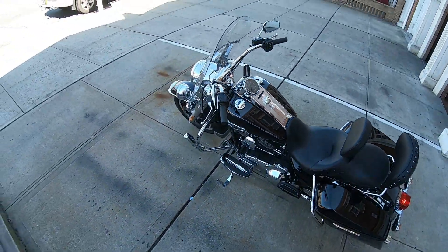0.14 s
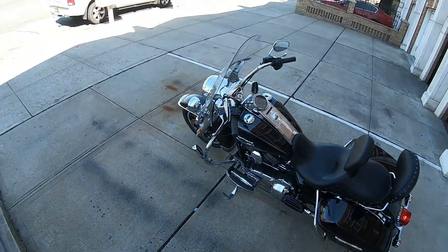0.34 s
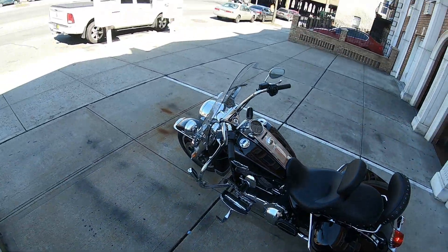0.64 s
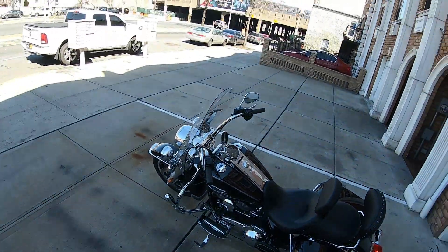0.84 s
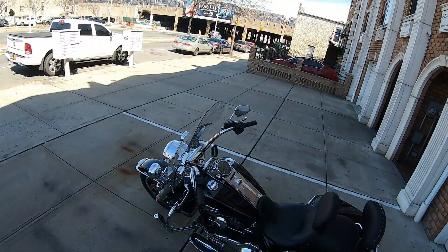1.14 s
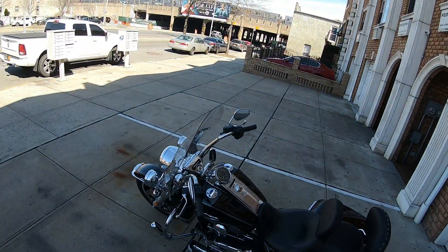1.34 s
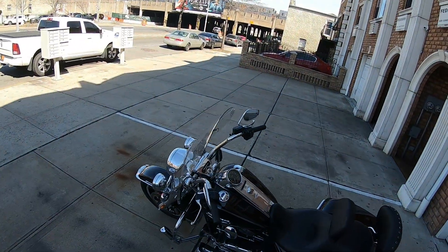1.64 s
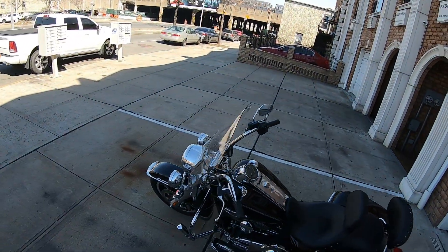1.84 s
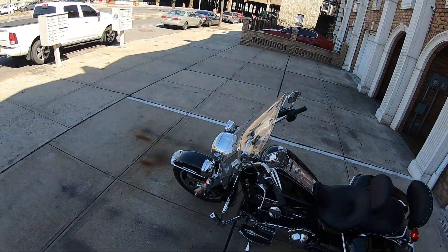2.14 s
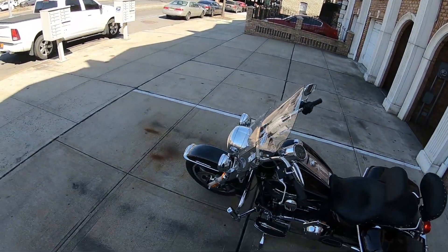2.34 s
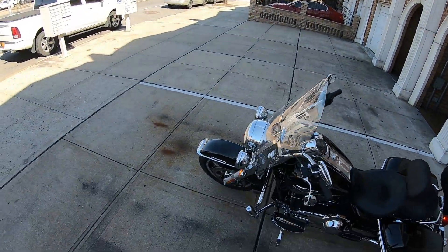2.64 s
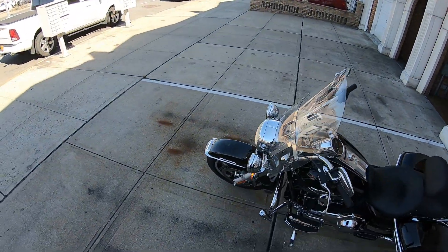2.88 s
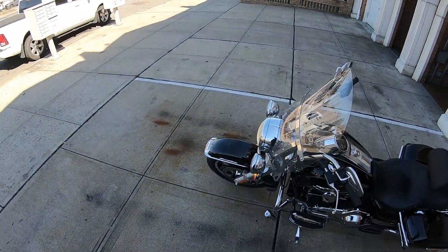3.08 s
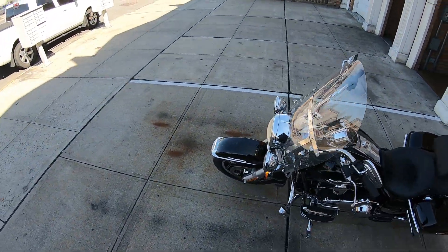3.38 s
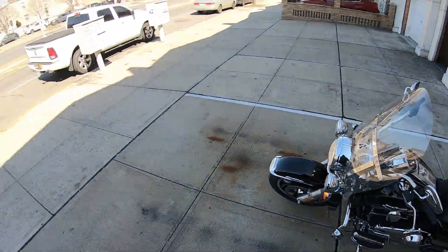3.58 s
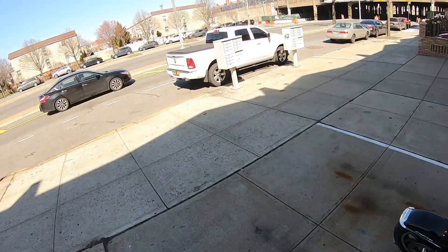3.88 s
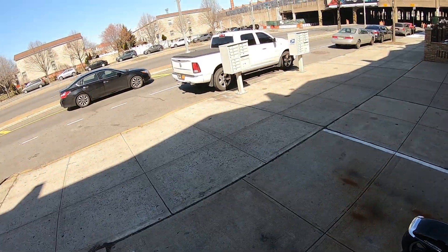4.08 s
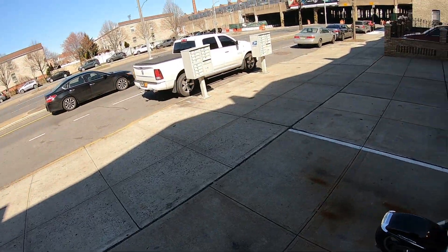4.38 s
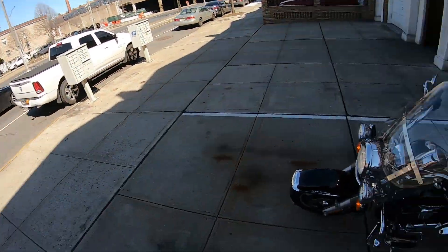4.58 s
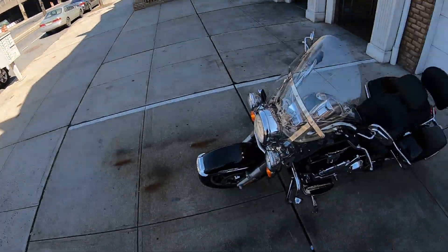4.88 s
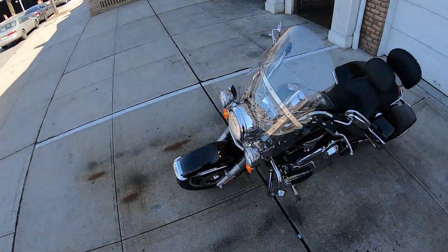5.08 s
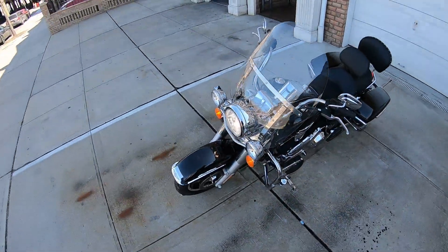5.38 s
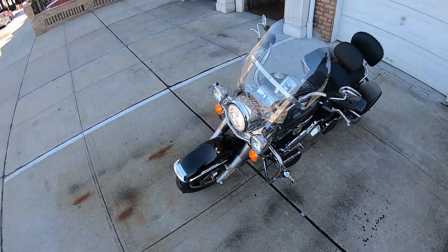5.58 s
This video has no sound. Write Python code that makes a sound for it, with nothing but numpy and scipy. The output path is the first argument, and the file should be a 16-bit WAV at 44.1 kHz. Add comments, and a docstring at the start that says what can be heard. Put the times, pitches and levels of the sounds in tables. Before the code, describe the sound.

Steady, loping exhaust rumble and mechanical clatter from a parked motorcycle idling outdoors, heard close up with brief wind buffets.

```python
"""A big V-twin motorcycle idles on a forecourt while someone walks round it with a small camera.
We start by the tailpipes: two unevenly spaced firings a cycle ring the pipes, gas rasps behind them,
and the weaker cylinder sometimes misses. From about 1.4 to 3 s, puffs of wind brush the microphone.
Alongside the engine the valve gear ticks and clatters, reflected by the pavement. By the end we are
ahead of the front wheel, where the boom has thinned and the bark comes forward."""
import sys
import numpy as np
from scipy import signal
from scipy.fft import rfft, irfft, next_fast_len
from scipy.io import wavfile
from scipy.ndimage import uniform_filter1d, minimum_filter1d

SR = 44100
rng = np.random.default_rng(int(sys.argv[2]) if len(sys.argv) > 2 else 0)


def persist_wave(psi):
    """Save psi, clipped to +-1, as 16-bit WAV."""
    counts = np.round(np.clip(psi, -1, 1) * 32767).astype(np.int16)
    wavfile.write(sys.argv[1], SR, np.atleast_2d(counts).T)


N = 252252
TIME = np.arange(N) / SR
# In shares of a cycle: the first firing, the gap to the second, a valve's delay after its firing.
FIRST_FIRING, TWIN_GAP, VALVE_LAG = .387, .43, .166
# The walk round the bike. Each row: time in seconds, place (0 by the tailpipes, 1 ahead of the bike).
WALK_PATH = [(0, 0.21), (1.25, 0.037), (1.9, 0.41), (3.2, 0.652), (5.72, 1)]


def undb(db):
    return 10 ** (np.asarray(db) / 20)


def unit(x):
    """Scale to rms 1."""
    return x / np.sqrt(np.mean(x ** 2))


def noise():
    return rng.standard_normal(N)


def curves(table):
    """Each column of a table, joined by straight lines in time."""
    seconds, *columns = np.transpose(table)
    return [np.interp(TIME, seconds, column) for column in columns]


def colour(x, points):
    """Causal EQ through (Hz, dB) points, falling steeply above the last."""
    size = 2 * next_fast_len(N)
    hz, db = np.transpose(points)
    freqs = np.maximum(np.arange(size // 2 + 1) * SR / size, 1)
    gain = undb(np.interp(np.log(freqs), np.log(hz), db)) * np.minimum(1, hz[-1] / freqs) ** 4
    cepstrum = irfft(np.log(gain))
    cepstrum[1:size // 2] *= 2  # fold to minimum phase
    cepstrum[size // 2 + 1:] = 0
    return irfft(rfft(x, size) * np.exp(rfft(cepstrum)))[:N]


def resonate(x, modes):
    """Steep resonances, scaled together to rms 1; neighbouring modes swing in opposite senses."""
    out = 0
    for k, (hz, width, db) in enumerate(modes):
        b, a = signal.iirpeak(hz, hz / width, fs=SR)
        out = out + (-1) ** k * undb(db) * signal.lfilter(b, a, signal.lfilter(b, a, x))
    return unit(out)


def strikes(times, sizes):
    """One impulse at each time."""
    at = (times * SR).astype(int)
    inside = (at >= 0) & (at < N)
    return np.bincount(at[inside], sizes[inside], N)


def fade(x, seconds):
    """Give each impulse an exponential tail."""
    return signal.lfilter([1], [1, -np.exp(-1 / (seconds * SR))], x)


def burst(x, rise_s, fall_s):
    """Give each impulse a soft attack and an exponential tail, peaking near 1."""
    return fade(fade(x, fall_s), rise_s) / SR * (1 / rise_s + 1 / fall_s) * np.sqrt(2)


def walk_gain(tail_db, front_db):
    """Gain of one voice as the microphone goes from the tail to the front."""
    return undb(tail_db + (front_db - tail_db) * curves(WALK_PATH)[0])


def gain_near(place, half_width, db):
    """A swell or dip round one place on the walk; a half width of 0 gives none."""
    return undb(db * np.exp(-((curves(WALK_PATH)[0] - place) / half_width) ** 2))


def beamed(x, modes):
    """Ring the modes of a metal part; each changes level as the microphone crosses its lobe."""
    return sum(undb(db) * gain_near(place, half_width, lobe_db) * resonate(x, [(hz, width, 0)])
               for hz, width, db, place, half_width, lobe_db in modes)


def cycle_times(offset):
    """The moments at which the engine passes one point of its cycle."""
    # The idle hunts a little. Each row: time in seconds, four-stroke cycles a second.
    idle_speed = [(0.0, 11.979), (0.48, 11.818), (0.61, 11.518), (1.24, 12.006), (1.39, 11.744),
                  (2.39, 11.81), (2.94, 11.987), (3.25, 11.657), (3.58, 12.014), (4.37, 11.705),
                  (4.95, 12.251), (5.72, 11.415)]
    cycles = np.cumsum(curves(idle_speed)[0]) / SR
    return np.interp(np.arange(cycles[-1] - offset) + offset, cycles, TIME)


def twin_strikes(lag, second_size, scatter_db):
    """An uneven blow from each cylinder, a share of a cycle (lag) after it fires."""
    first, second = cycle_times(FIRST_FIRING + lag), cycle_times(FIRST_FIRING + lag + TWIN_GAP)
    sizes = np.r_[np.ones(len(first)), np.full(len(second), second_size)]
    sizes *= undb(scatter_db * rng.standard_normal(len(sizes)))
    return strikes(np.r_[first, second], sizes)


def high_hiss(pulsing):
    """A faint high hiss near 11 kHz that fades briefly midway."""
    # The row: centre and width in Hz, level in dB, then the dip's place, half width and depth in dB.
    hiss_band = [(11400, 2600, -80.5, .6, 0.1, -11.5)]
    hz, width, db, *dip = hiss_band[0]
    return undb(db) * gain_near(*dip) * resonate(pulsing + noise(), [(hz, width, 0)])


def wind(breeze_db=-34.0):
    """Short eddies at the microphone over a light, steady rumble."""
    # Each row: peak time, rise and fall in seconds, then hiss, flutter and rumble in dB.
    puffs = [(1.444, 0.07, 0.052, -29, -25.5, -24), (1.515, 0.0055, 0.028, -27, -26, -14.5),
             (1.553, 0.017, 0.058, -25.5, -33, -17), (1.803, 0.035, 0.049, -29.5, -42, -17.5),
             (2.424, 0.013, 0.034, -15, -36, -19), (2.481, 0.004, 0.013, -26, -43, -20),
             (2.67, 0.15, 0.05, -30, -47, -29), (2.92, 0.2, 0.2, -59, -43, -20)]
    # The EQ of hiss and rumble. Each row: frequency in Hz, relative level in dB.
    hiss_eq = [(60, 4), (250, -6), (420, -6), (800, -13), (1300, -20), (2500, -36.5), (5000, -68.5)]
    rumble_eq = [(10, -10), (30, 11), (70, 16.5), (110, 15), (200, -6.5), (500, -67.5)]
    # An eddy's flutter. The row: pitch and width in Hz, relative level in dB.
    flutter_band = [(193, 63, 0)]
    hiss, flutter, rumble = 0, 0, undb(breeze_db)
    for peak_s, rise_s, fall_s, hiss_db, flutter_db, rumble_db in puffs:
        swell = np.exp(-((TIME - peak_s) / np.where(TIME < peak_s, rise_s, fall_s)) ** 2)
        hiss += undb(hiss_db) * swell
        rumble += undb(rumble_db) * swell
        flutter += undb(flutter_db) * swell
    return (hiss * unit(colour(noise(), hiss_eq))
            + rumble * unit(colour(noise(), rumble_eq))
            + flutter * resonate(noise(), flutter_band))


def pavement(x, lag_s=.0028, sway_s=0.000495, share=0.31):
    """Add the ground reflection; its delay shifts as the microphone is carried round."""
    sway = signal.resample(rng.standard_normal(8), N)
    reflection = np.interp(TIME - lag_s - sway_s * sway, TIME, x)
    return (x + share * reflection) / np.hypot(1, share)


def cover_buzz():
    """Every closing of a valve sets the thin covers buzzing for a moment; a faint hiss lies above."""
    # Each row: frequency in Hz, relative level in dB.
    buzz_eq = [(3000, -2.5), (4000, 7), (4600, -7), (5700, -16.5), (7000, -5.5), (8300, -1), (8900, -7.5),
               (9700, -25), (15000, -41.5)]
    # Each row: time in seconds, level in dB.
    buzz_level = [(0, -63), (1.3, -59), (2.3, -63), (3.5, -65), (4.4, -69), (4.8, -53.5), (5.3, -62),
                  (5.72, -61.5)]
    closings = twin_strikes(lag=0.15, second_size=0.23, scatter_db=2)
    shake = burst(closings, rise_s=0.004, fall_s=0.0075) * noise()
    buzz = undb(curves(buzz_level)[0]) * unit(colour(shake, buzz_eq))
    return buzz + high_hiss(unit(shake))


def piston_knock(level_db=-47):
    """The pistons slap the crankcase with a dull knock after each firing."""
    # The row: pitch and width in Hz, relative level in dB.
    crankcase_mode = [(321, 136, 0)]
    slaps = twin_strikes(lag=0.1351, second_size=0.12, scatter_db=2.5)
    return undb(level_db) * resonate(slaps, crankcase_mode)


def clatter(count=30, spread_db=3, scatter_db=8, jitter_s=.0008, ring_s=0.0055, whirr=1.04):
    """Gears, chain and lifters knock at the same points of every cycle and ring the castings."""
    hits = np.zeros(N)
    offsets = (np.arange(count) + rng.random(count)) / count
    for offset, weight in zip(offsets, rng.uniform(0.73, 1, count)):
        times = cycle_times(offset)
        slip, force = rng.standard_normal((len(times), 2)).T
        hits += strikes(times + jitter_s * slip, undb(spread_db * weight + scatter_db * np.tanh(force)))
    casting = rng.standard_normal(SR // 20) * np.exp(-TIME[:SR // 20] / ring_s)
    return unit(signal.fftconvolve(hits, casting)[:N]) + whirr * noise()


def engine_clatter(surge=0.77, heads_db=-49, fins_shade=1.4):
    """The clatter as the crankcase, the heads, their cooling fins and the thin covers radiate it."""
    # The engine is shaded as the microphone turns to the street. Each row: time in seconds, gain in dB.
    facing = [(0, 0.5), (1, 1.5), (1.5, 0.5), (2.7, 3.5), (3.45, 2.5), (3.95, -2.5), (4.45, -5),
              (4.8, -0.5), (5.72, -1.5)]
    # Each row: time in seconds, midrange level in dB, treble level in dB.
    clatter_level = [(0, -45, -56), (1.1, -44.5, -56.5), (1.7, -46, -58), (2.7, -47, -58),
                     (3.1, -43, -56.5), (4, -46, -59), (4.5, -45.5, -57.5), (4.7, -45.5, -53.5),
                     (5.1, -44.5, -55), (5.45, -49, -58.5)]
    # The EQ of crankcase, heads and sizzling covers. Each row: frequency in Hz, relative level in dB.
    case_eq = [(1000, -35.5), (1350, 3.5), (1680, 3), (2000, 1.5), (2350, 1.5), (2650, 0), (3100, -57.5)]
    heads_eq = [(2300, -35), (2750, 7), (3050, 7.5), (3290, 2), (3600, 5.5), (4050, 2.5), (4500, -7.5),
                (5300, -60.5)]
    sizzle_eq = [(4000, -1), (4800, -4.5), (5700, -11), (6500, -10.5), (7200, -5.5), (8100, -3.5),
                 (8800, -10.5), (9600, -33.5), (11800, -30.5), (15000, -50.5)]
    # Each row: pitch and width in Hz, level in dB, lobe place, half width, gain in dB.
    fin_modes = [(3283, 170, -59, .64, 0, 8), (3330, 110, -60, 0, 0.2, 5.5),
                 (3257, 67, -63.5, 0.96, 0.06, 12), (3780, 110, -66, .62, 0, 5),
                 (6670, 1500, -85.5, .665, .17, 18), (7070, 130, -84, 0.7, .035, 17)]
    facing_db = curves(facing)[0]
    midrange_db, treble_db = curves(clatter_level)
    parts = ((midrange_db, case_eq), (heads_db + facing_db, heads_eq), (treble_db, sizzle_eq))
    fins = undb(fins_shade * facing_db) * beamed(clatter(), fin_modes)
    body = sum(undb(db) * unit(colour(clatter(), eq)) for db, eq in parts)
    # The strong power stroke loads the gears, so the clatter surges once a cycle.
    strokes = cycle_times(FIRST_FIRING + 0.14)
    load = 1 + surge * burst(strikes(strokes, np.ones(len(strokes))), rise_s=0.0034, fall_s=0.0048)
    return unit(load) * (fins + body)


def contact(hits, rough=.8, rebound_s=.003, rebound=0.45):
    """Each blow, its rebound a few milliseconds later and a short rattle."""
    rattle = burst(hits, rise_s=0.00094, fall_s=0.0042)
    at = np.flatnonzero(hits)
    delays = rebound_s * (1 + .15 * rng.standard_normal(len(at)))
    bounces = strikes(at / SR + delays, rebound * hits[at])
    return np.std(rattle) * unit(unit(hits + bounces) + rough * unit(rattle * noise()))


def valve_ticks(front_db=-40, rear_db=-47, scatter_db=0.5, lead_s=0.0003, snap_db=-12, tap_db=-0.5):
    """A valve snaps shut after each firing and clacks in the rocker cover; hard blows ring the steel."""
    # The hardest ticks. Each row: time in seconds, cover clack in dB, steel ring in dB.
    hard_ticks = [(0.7256, -37.5, -37), (0.8099, -37.5, -33), (0.8942, -37, -38.5), (0.9794, -39.5, -33.5),
                  (1.0617, -36.5, -34), (1.3195, -36, -45.5), (1.486, -39.5, -36), (1.7394, -32.5, -32.5),
                  (1.8237, -35, -35.5), (1.9125, -38.5, -31), (2.0827, -37.5, -40), (2.3352, -30.5, -43),
                  (2.6723, -39, -39.5), (2.8437, -36, -38.5), (2.9242, -34.5, -36), (3.0064, -29, -34.5),
                  (3.0934, -31, -40), (3.1763, -35, -42), (3.2637, -29.5, -40.5), (3.434, -38.5, -35.5),
                  (3.6847, -37.5, -45), (4.0193, -36, -52), (4.5301, -35, -49.5), (4.6141, -30, -45.5),
                  (4.6969, -36.5, -49), (4.781, -35.5, -51), (4.945, -38, -45), (5.0246, -37.5, -43),
                  (5.1102, -37.5, -46), (5.1943, -36, -44), (5.279, -36, -41.5)]
    # The rocker cover. Each row: pitch and width in Hz, level in dB, lobe place, half width, gain in dB.
    cover_modes = [(1760, 170, -12, .65, 0.13, 8.5), (3765, 210, -6, 0.8, 0.2, 1),
                   (3966, 270, -8, 0.9, 0.2, 5), (4530, 440, -30.5, .95, .06, 20.5),
                   (8400, 720, -32, .95, .09, 12)]
    # Each row: frequency in Hz, relative level in dB.
    snap_eq = [(600, -37.5), (1300, -17.5), (1720, -0.5), (2500, -2.5), (3300, 7), (4000, 10), (4600, -24),
               (6000, -26), (8200, -19.5), (9700, -36.5), (15000, -50.5)]
    # Each row: pitch and width in Hz, relative level in dB.
    steel_modes = [(1700, 200, -8), (3334, 800, 0)]
    first = cycle_times(FIRST_FIRING + VALVE_LAG)
    second = cycle_times(FIRST_FIRING + VALVE_LAG + TWIN_GAP)
    first_db = front_db + scatter_db * rng.standard_normal(len(first))
    second_db = rear_db + scatter_db * rng.standard_normal(len(second))
    taps = np.zeros(len(first))
    for time_s, clack_db, ring_db in hard_ticks:
        nearest = np.argmin(abs(first - time_s))
        first[nearest] = time_s - lead_s
        first_db[nearest], taps[nearest] = clack_db, undb(ring_db)
    # The second cylinder's valve is clearest beside the engine.
    beside = gain_near(place=0.66, half_width=0.076, db=6.5)
    clack = contact(strikes(first, undb(first_db)) + beside * strikes(second, undb(second_db)))
    ring = contact(strikes(first, taps))
    cover = beamed(clack, cover_modes) + undb(snap_db) * unit(colour(clack, snap_eq))
    return np.std(clack) * cover + np.std(ring) * undb(tap_db) * resonate(ring, steel_modes)


def firings(second_db=-5, scatter_db=1.3, second_scatter_db=2.07, jitter_s=.00016):
    """Pressure pulses of the two cylinders; the second burns weaker and less evenly."""
    # The second cylinder's misses. Each row: time in seconds, change of level in dB.
    misses = [(.25, -3), (.68, -11), (.85, -5), (1.44, -8.5), (1.61, -3), (2.46, -3), (2.71, -0.5),
              (3.89, -4.5), (4.06, -7), (4.74, -5)]
    first, second = cycle_times(FIRST_FIRING), cycle_times(FIRST_FIRING + TWIN_GAP)
    burn_db = second_db + second_scatter_db * rng.standard_normal(len(second))
    for time_s, db in misses:
        burn_db[np.argmin(abs(second + .02 - time_s))] += db
    times = np.r_[first, second]
    sizes = undb(np.r_[scatter_db * rng.standard_normal(len(first)), burn_db])
    return strikes(times + jitter_s * rng.standard_normal(len(times)), sizes)


def exhaust(pulses, flow_s=0.045, steady_flow=1.0, thump_db=-14):
    """Each pulse rings the pipes, and the turbulent gas behind it keeps them rasping."""
    # The pipes' three low voices. Each row: pitch and width in Hz, relative level in dB.
    boom_modes = [(52.97, 8.8, 6.5), (179.5, 50, -14)]
    thump_modes = [(96.6, 30.2, -6.5), (124, 42.4, 0.5), (134.33, 30.1, 1), (152.55, 9.1, -11.5)]
    bark_modes = [(195.5, 27.5, 12), (232, 117, -7.5)]
    # The tailpipes' hollow tones and the header pipes' steel walls.
    # Each row: pitch and width in Hz, level in dB, lobe place, half width, gain in dB.
    tailpipe_modes = [(171.3, 35, -42.5, 0.1, .2, 16.5), (275, 11, -55, 0.2, 0.5, 8.5),
                      (347, 27, -53, .08, .18, 16)]
    header_modes = [(813, 43, -55.5, 0, 0.9, 11), (851, 7.8, -58, 0.8, 0.4, 3),
                    (923, 66, -56.5, 0.7, 0.3, 6), (1122, 160, -53, .7, .08, 6.5),
                    (1189, 58, -52, 0.5, 0.5, -5), (1677, 59, -63.5, .05, 0.1, 12)]
    # Each row: frequency in Hz, relative level in dB.
    rasp_eq = [(250, -24.5), (400, -0.5), (520, -2.5), (600, 0), (730, 0), (830, 2.5), (940, -0.5),
               (1070, -6), (1220, -3), (1350, -14.5), (1700, -40)]
    # Each row: time in seconds, level in dB.
    rasp_level = [(0, -39.5), (1.2, -39), (1.75, -45), (2.7, -40.5), (2.95, -46.5), (3.35, -49.5),
                  (3.8, -44.5), (4.6, -42.5), (5.1, -46), (5.72, -50.5)]
    flow = unit(fade(pulses, flow_s)) + steady_flow
    push, gas = unit(pulses), unit(flow * noise())  # more gas, rougher voice
    boom = walk_gain(tail_db=-17, front_db=-26.5) * resonate(push + 0.12 * gas, boom_modes)
    thump = undb(thump_db) * resonate(push + .055 * gas, thump_modes)  # carries equally all round
    bark = walk_gain(tail_db=-37, front_db=-29) * resonate(push + gas, bark_modes)
    bark *= gain_near(place=0.56, half_width=0.12, db=-7.5)  # dips beside the bike
    tailpipes = beamed(push + 2.1 * gas, tailpipe_modes)
    headers = beamed(push + 3 * gas, header_modes)
    rasp = undb(curves(rasp_level)[0]) * unit(colour(flow * noise(), rasp_eq))
    return boom - thump + bark + tailpipes + headers + rasp


def scene():
    """The idling bike and the wind, in mono."""
    throb = exhaust(firings()) + piston_knock()
    mechanics = engine_clatter() + valve_ticks() + cover_buzz()
    return (throb + pavement(mechanics) + wind())[None]


def record(dry, ceiling=0.46, top_hz=15600):
    """The camera's limiter eases down the peaks; the top is cut."""
    needed_gain = np.minimum(1, ceiling / (abs(dry) + 1e-9))
    gain = uniform_filter1d(minimum_filter1d(needed_gain, size=300), size=400)
    high_cut = signal.ellip(8, .2, 70, top_hz, fs=SR, output="sos")
    return signal.sosfilt(high_cut, dry * gain)


dry = scene()
out = record(dry)
persist_wave(out)
```